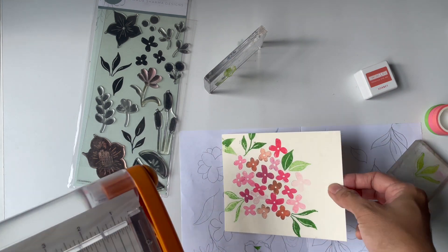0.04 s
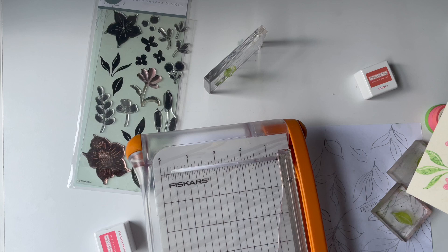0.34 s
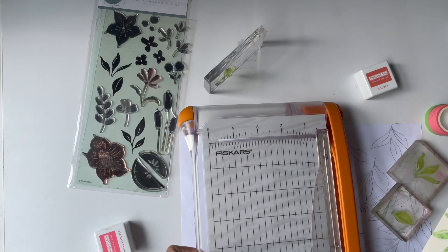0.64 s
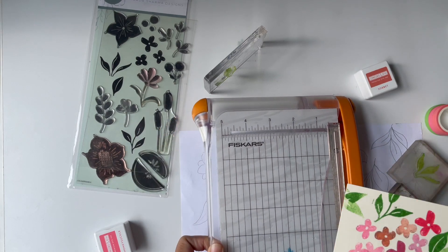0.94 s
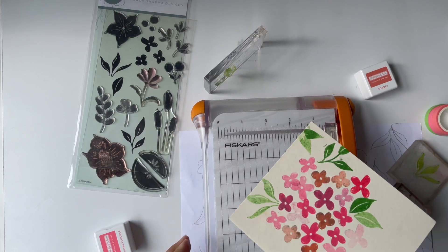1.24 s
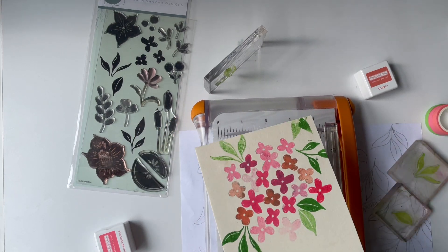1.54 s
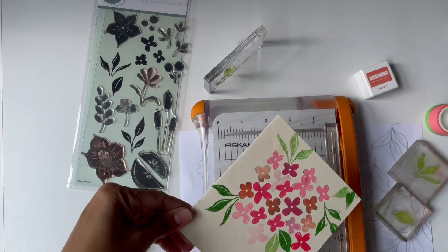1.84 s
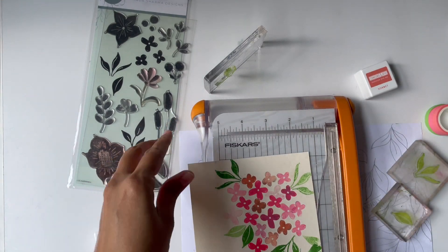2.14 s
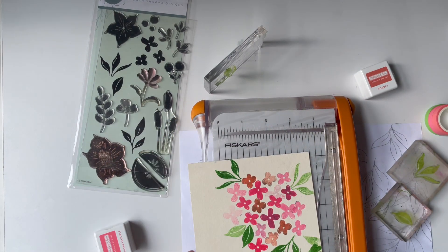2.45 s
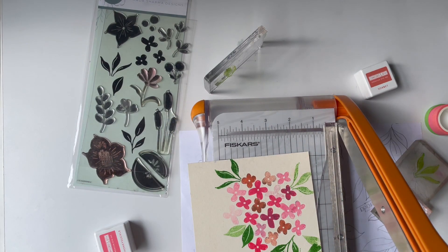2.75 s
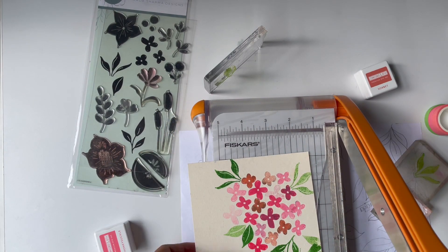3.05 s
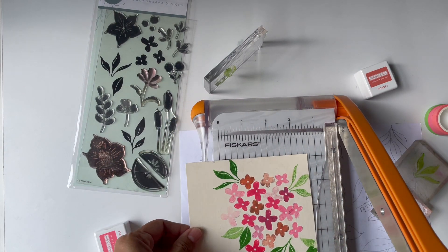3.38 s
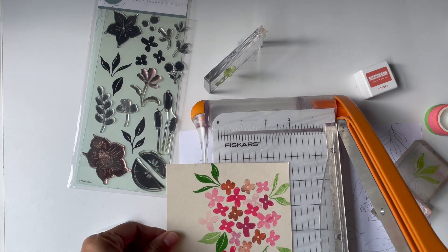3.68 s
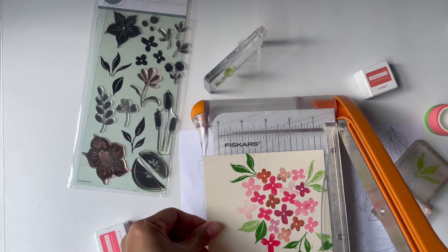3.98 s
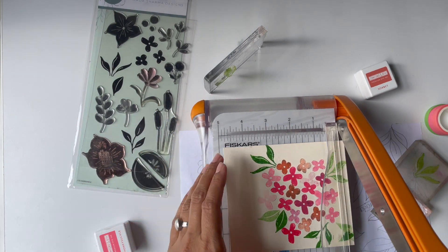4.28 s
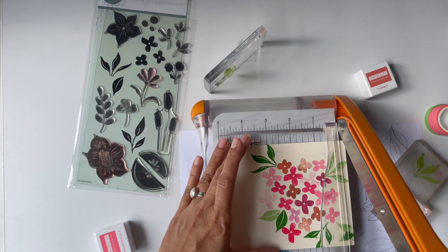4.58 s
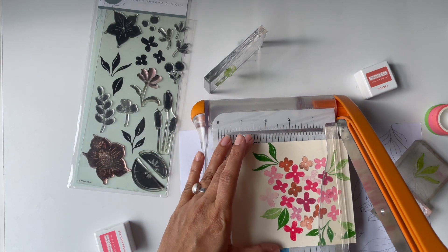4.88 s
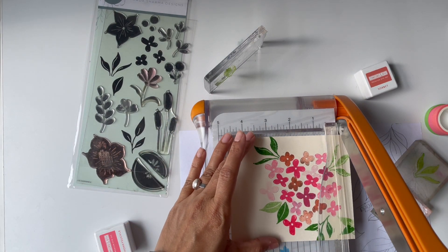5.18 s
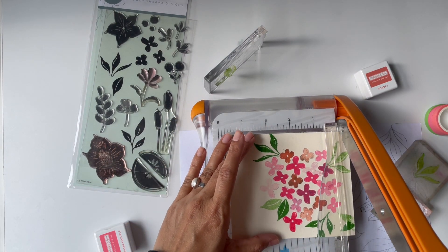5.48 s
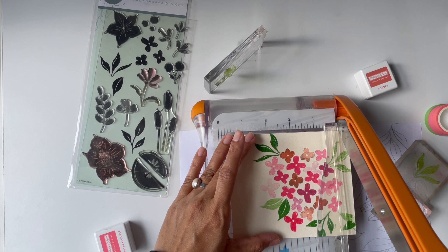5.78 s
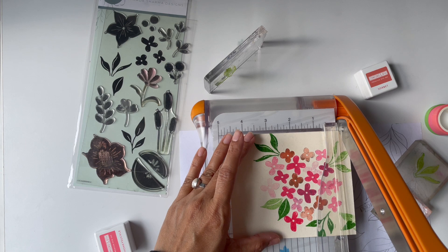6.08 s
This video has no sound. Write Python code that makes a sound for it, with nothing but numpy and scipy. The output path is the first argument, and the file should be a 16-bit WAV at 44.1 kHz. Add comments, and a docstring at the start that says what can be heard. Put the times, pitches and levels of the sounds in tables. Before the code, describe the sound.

A plastic paper trimmer knocks onto a desk, its blade arm lifts with a loud steel scrape, and a card slides and taps.

```python
"""A card is picked up; a plastic guillotine paper trimmer is dragged over a desk, its rubber feet juddering,
and set down with knocks that ring shell and desk top. The card is laid on the bed. At 2.4 s the blade arm lifts
with a loud steel-on-steel scrape, then clacks against its stop. The card is slid about and tapped into line. A
small room rumbles low throughout; the stereo is wide, left and right parting in phase through the treble."""
import sys
import numpy as np
from scipy import signal
from scipy.fft import rfft, irfft, next_fast_len
from scipy.io import wavfile
from scipy.ndimage import uniform_filter1d

SR = 44100
rng = np.random.default_rng(int(sys.argv[2]) if len(sys.argv) > 2 else 0)


def to_wav(sig):
    """Store sig (one row per channel, or 1-D mono) as 16-bit WAV at the path in sys.argv[1].

    Samples outside -1..1 are clipped; the rate is SR.
    """
    pcm = np.clip(np.atleast_2d(sig), -1, 1) * 32767
    pcm = np.round(pcm).astype(np.int16)
    wavfile.write(sys.argv[1], SR, pcm.T)  # frames by channels


N = 278918

# Modes of the plastic shell. Each row: frequency in Hz, relative level in dB, t60 in seconds.
SHELL_MODES = [(580, -7, 0.038), (725.8, 5, 0.082), (791, -2.5, 0.18), (914.4, -11, 0.19),
               (1052, -12, 0.089), (1336, 2, .06), (1637, -6.5, 0.089), (1820, -10.5, 0.044),
               (2516, -18, 0.18), (3030, -20, 0.1)]
# Spectra of plastic clack, dull thud and hollow bed. Each row: frequency in Hz, relative level in dB.
CLACK_SPECTRUM = [(150, -27), (400, -3.5), (700, 7.5), (1000, 1.5), (1450, -0.5), (1900, -8), (2400, -18.5),
                  (3100, -22), (4000, -37), (9000, -53)]
THUD_SPECTRUM = [(40, -20.5), (100, -15), (220, 0.5), (330, 2.5), (480, -17), (900, -37.5), (3000, -65)]
BED_SPECTRUM = [(100, -11), (300, 5), (480, -4), (650, -3), (850, -1), (1300, -4), (2000, -6), (3200, -12),
                (6000, -30.5)]


def amp(db):
    """Decibels to gain."""
    return 10 ** (np.asarray(db) / 20)


def unit(x, size=None):
    """Scale to rms 1, taken over the first size samples if given."""
    return x / np.sqrt(np.mean(x[:size] ** 2) + 1e-20)


def lookup(points, hz):
    """Interpolate a table on a log frequency axis."""
    table_hz, value = np.transpose(points)
    return np.interp(np.log(hz + 1), np.log(table_hz + 1), value)


def add(mix, start_s, sound):
    """Mix a sound in at start_s."""
    part = mix[max(round(start_s * SR), 0):][:len(sound)]
    part += sound[:len(part)]


def colour(x, spectrum, size=4096):
    """Minimum-phase filter with the given spectrum."""
    log_gain = np.log(amp(lookup(spectrum, abs(np.fft.fftfreq(size, 1 / SR)))))
    impulse = np.fft.ifft(np.exp(np.conj(signal.hilbert(log_gain)))).real
    return signal.fftconvolve(x, impulse[:size // 2])[:len(x)]


def resonate(x, hz, width_hz):
    """Two-pole resonance."""
    r = np.exp(-np.pi * width_hz / SR)
    return signal.lfilter([1, 0, -1], [1, -2 * r * np.cos(2 * np.pi * hz / SR), r * r], x)


def soften(x, cutoff_hz):
    """A softer contact loses its treble."""
    return signal.sosfilt(signal.butter(3, cutoff_hz, fs=SR, output="sos"), x)


def drift(size):
    """Noise of rms 1, smoothed over size samples."""
    return unit(uniform_filter1d(rng.standard_normal(N), size))


def burst(spectrum, t60_s, rise_s, size=8192):
    """Contact: pressure builds, then chatter dies in many close, damped modes."""
    t = np.arange(size) / SR
    chatter = rng.choice([-1., 1.], size) * amp(-60 * t / t60_s) * (1 - np.exp(-t / rise_s))
    return unit(colour(chatter, spectrum), size=440)


def ring(modes, vary_db, size=22050):
    """Struck modes; strengths vary with where the blow lands."""
    t = np.arange(size) / SR
    gains = amp(vary_db * rng.standard_normal(len(modes))) * rng.choice([-1, 1], len(modes))
    partials = (gain * amp(db - 60 * t / t60_s) * np.sin(2 * np.pi * hz * t)
                for gain, (hz, db, t60_s) in zip(gains, modes))
    return unit(sum(partials), size=440)


def sing(hz, waver=.012):
    """Rubbed mode: a tone of unsteady pitch."""
    return np.sin(2 * np.pi * np.cumsum(hz * (1 + waver * drift(size=120))) / SR)


def friction(slips_per_s, grain_db, smooth, flutter_db, drift_samples=600):
    """Tiny uneven slips over a smooth rub, clumped by wavering pressure."""
    hits = rng.random(N) < slips_per_s / SR
    slips = hits * amp(grain_db * np.minimum(rng.exponential(1, N), 4)) * rng.choice([-1, 1], N)
    pressure = amp(flutter_db * drift(drift_samples))
    return unit((unit(slips) + smooth * rng.standard_normal(N)) * pressure)


def wander(x, depth_db, bins, frames):
    """A sliding contact moves, so its resonances come and go."""
    spectra = signal.stft(x, SR, nperseg=1024, noverlap=768)[2]
    field = uniform_filter1d(rng.standard_normal(spectra.shape), bins, axis=0)
    field = unit(uniform_filter1d(field, frames, axis=1))
    return unit(signal.istft(spectra * amp(depth_db * field), SR, nperseg=1024, noverlap=768)[1][:N])


def push_gains(pushes, speed_power):
    """Hiss and rub gains; friction follows each push as it speeds up and slows to rest."""
    t, gains = np.arange(N) / SR, np.zeros((2, N))
    for start_s, rise_s, fall_s, hiss_db, rub_db in pushes:
        speed = np.sin(np.pi / 2 * np.interp(t - start_s, [0, rise_s, rise_s + fall_s], [0, 1, 0]))
        gains += amp([[hiss_db], [rub_db]]) * speed ** speed_power
    return gains


def trimmer_knocks():
    """Each blow ticks, rings the plastic shell and pushes the desk top."""
    # Each row: start in seconds, relative clack, thud and tick levels in dB, clack cutoff in Hz.
    blows = [(0.703,-15.5,-28.5,-47.5,5000), (0.71,-19.5,-29,-43.5,4970), (0.751,-20,-31.5,-69,3500),
             (0.766,-16.5,-26,-30.5,5010), (0.777,-25,-27.5,-54.5,2520), (0.804,-20,-40,-66.5,5000),
             (0.821,-21,-29,-57.5,5000), (0.835,-25.5,-31,-54.5,4000), (1.004,-40.5,-39.5,-67,2210),
             (1.029,-39.5,-51,-61,3960), (1.119,-15,-23.5,-58,1680), (2.421,-30,-52.5,-44,4003),
             (2.659,-23,-35.5,-53,4004), (2.702,-20,-33.5,-31,4990), (2.719,-31.5,-33.5,-64,2520),
             (2.733,-25,-31.5,-25,4930)]
    # Each row: frequency in Hz, relative level in dB, t60 in seconds.
    desk_modes = [(112, -2.5, .25), (178.7, -6, 0.16), (226, -3, 0.19), (299.4, -5, 0.36), (409, -5.5, .12),
                  (501, -6.5, 0.22)]
    # Each row: frequency in Hz, relative level in dB.
    tick_spectrum = [(500, -31.5), (1500, -1.5), (2300, 7), (3500, 0.5), (4700, -4), (6000, -1), (9000, -3),
                     (13500, -6.5), (16000, -13.5)]
    out = np.zeros(N)
    for start_s, clack_db, thud_db, tick_db, cutoff_hz in blows:
        clack = burst(CLACK_SPECTRUM, t60_s=.036, rise_s=.0012)
        add(out, start_s, amp(clack_db - 13.5) * soften(clack, cutoff_hz))
        add(out, start_s + .001, amp(clack_db - 14) * soften(ring(SHELL_MODES, vary_db=2), cutoff_hz))
        add(out, start_s + .0015, amp(thud_db - 3.5) * burst(THUD_SPECTRUM, t60_s=.027, rise_s=.002))
        add(out, start_s + .0018, amp(thud_db - 5) * ring(desk_modes, vary_db=3))
        add(out, start_s, amp(tick_db - 4) * burst(tick_spectrum, t60_s=.029, rise_s=.00067))
    return out


def blade_force(bite_db, start_s=2.404, rise_s=.077, hold_s=.03, graze_db=-56, graze_s=.3):
    """The blades press harder, hold, then part; a light graze lasts while the arm swings."""
    t = np.arange(N) / SR - start_s
    parting_db = 270.5 * np.maximum(t - rise_s - hold_s, 0)
    press = amp(bite_db - parting_db) + amp(graze_db) * (t < graze_s)
    return np.clip(t / rise_s, 0, 1) ** 2.3 * press


def blade_scrape(bite_db=-19, grip_db=4.5, catch_db=-32):
    """Steel grinds along steel; stick-slip locks onto one mode after another."""
    # Grind spectrum and blade modes. Each row: frequency in Hz, relative level in dB.
    steel_spectrum = [(100, -24.5), (300, -8.5), (600, -9.5), (1100, -3.5), (1900, 4), (3000, -2),
                      (4600, -8), (6200, -5.5), (7300, -12), (8400, -2), (10500, -12), (13500, -10),
                      (16000, -27.5)]
    blade_modes = [(530, -39.5), (1020, -30), (1305, -32), (1480, -32), (1735, -31), (1850, -32.5),
                   (1940, -30), (2123, -33), (2810, -31.5), (3215, -37), (6330, -37.5)]
    # Blade catches. Each row: centre and half length in seconds, pitch in Hz, full-contact level in dB.
    squeals = [(2.458, .018, 1038, -30.5), (2.47, 0.0055, 1794, -23), (2.473, 0.0021, 5500, -25),
               (2.488, 0.0045, 3920, -22), (2.51, .008, 520, -29), (2.513, .015, 2747, -25.5),
               (2.523, .012, 1720, -29.5), (2.537, 0.0099, 618, -31), (2.565, 0.0047, 1290, -24)]
    force, t = blade_force(bite_db), np.arange(N) / SR
    slips = friction(slips_per_s=1500, grain_db=1.8, smooth=.7, flutter_db=1, drift_samples=150)
    slips = wander(slips, depth_db=3.5, bins=4, frames=6)
    out = amp(-3) * force * unit(colour(slips, steel_spectrum))
    for hz, db in blade_modes:
        grip = unit(amp(grip_db * drift(size=700)))
        out += amp(db - 2 - bite_db) * force * grip * sing(hz)
    contact = np.minimum(force / amp(catch_db), 1)
    for centre_s, half_s, hz, db in squeals:
        out += amp(db) * np.exp(-.5 * ((t - centre_s) / half_s) ** 2) * contact * sing(hz)
    return out


def arm_stop(start_s=2.747, rise_s=.0016):
    """The raised arm settles on its stop with a dull bump."""
    # Each row: frequency in Hz, relative level in dB, t60 in seconds.
    arm_modes = [(241.3, 0.5, 0.062), (299, -17, 0.33), (184.7, -8.5, 0.17)]
    out, body = np.zeros(N), ring(arm_modes, vary_db=1.5)
    attack = 1 - np.exp(-np.arange(len(body)) / SR / rise_s)
    add(out, start_s, amp(-24) * body * attack)
    add(out, start_s, amp(-35) * burst(THUD_SPECTRUM, t60_s=.051, rise_s=.0021))
    return out


def hinge_rub(db=-43, start_s=2.53, length_s=.25):
    """The plastic pivot rubs and sounds the shell as the arm swings."""
    out = np.zeros(N)
    rub = friction(slips_per_s=1200, grain_db=2.2, smooth=.7, flutter_db=1.5)
    rattle = colour(rub, BED_SPECTRUM)[:int(length_s * SR)]
    add(out, start_s, amp(db) * unit(rattle) * signal.windows.tukey(len(rattle), .25))
    return out


def trimmer_drag():
    """Dragged or scuffing feet hiss and set the shell droning."""
    # Each row: start, speed-up and slow-down in seconds, relative hiss and drone levels in dB.
    pushes = [(.235, 0.19, 0.16, -47.5, -43.5), (.68, 0.031, .02, -78, -47.5), (1.085, .034, .02, -77, -50)]
    # Each row: frequency in Hz, relative level in dB.
    hiss_spectrum = [(600, -11.5), (1500, -2.5), (2600, -3), (3600, 3), (4400, -0.5), (5700, 1.5),
                     (8000, -8.5), (11000, -12), (13300, -4), (16000, -19)]
    drone_spectrum = [(100, -11), (220, -16), (300, 9), (430, -9), (520, 4.5), (660, -11), (930, -8),
                      (1400, -16), (4000, -35.5)]
    hiss_gain, drone_gain = push_gains(pushes, speed_power=2.32)
    rub = friction(slips_per_s=6000, grain_db=2, smooth=1, flutter_db=.7)
    rub = wander(rub, depth_db=3.2, bins=9, frames=20)
    hiss = hiss_gain * unit(colour(rub, hiss_spectrum))
    return hiss + amp(-.5) * drone_gain * unit(colour(rub, drone_spectrum))


def feet_judder(peak_db=-57.5, start_s=.51, gap_s=.0252, count=6):
    """As the trimmer slows, its rubber feet stick and skip at an even pace."""
    out = np.zeros(N)
    for k in range(count):
        gain = amp(peak_db) * np.sin(np.pi * (k + 1) / (count + 1))
        add(out, start_s + k * gap_s, gain * burst(CLACK_SPECTRUM, t60_s=.032, rise_s=.001))
    return out


def card_taps():
    """The stiff card snaps at its edge, knocks the hollow bed and skids a little."""
    # Card and fingertip contacts. Each row: start in seconds, relative snap and bed levels in dB.
    taps = [(0.01,-49,-59), (0.149,-59,-52.5), (1.466,-59,-61.5), (1.573,-53,-54.5), (1.947,-46,-40),
            (1.959,-43,-40.5), (2.043,-54,-40), (2.094,-58,-42), (2.1047,-29.5,-41), (2.325,-56.5,-58.5),
            (2.35,-59.5,-72), (2.901,-53,-75), (2.92,-50.5,-55.5), (3.229,-59,-66.5), (3.258,-55.5,-63),
            (3.2851,-56.5,-53), (3.331,-59.5,-65), (3.39,-53.5,-43.5), (3.444,-49,-45.5), (3.457,-51,-44),
            (3.475,-46.5,-42.5), (3.565,-56,-47.5), (3.66,-51.5,-45.5), (3.9118,-35,-40.5),
            (4.3904,-62.5,-87.5), (4.434,-52,-55), (4.445,-44.5,-46.5), (4.662,-28,-43), (4.666,-41,-33),
            (5.269,-63,-85.5), (5.437,-66.5,-84)]
    # Each row: frequency in Hz, relative level in dB.
    snap_spectrum = [(400, -22.5), (1500, -11), (2300, -3.5), (3000, -4), (4800, -5), (6500, -5.5),
                     (9000, -2), (13000, -5), (16000, -21)]
    out = np.zeros(N)
    for start_s, snap_db, bed_db in taps:
        add(out, start_s, amp(snap_db - 8.5) * burst(snap_spectrum, t60_s=.018, rise_s=.0008))
        add(out, start_s, amp(bed_db - 9.5) * burst(BED_SPECTRUM, t60_s=.03, rise_s=.0032))
        add(out, start_s, amp(bed_db - 14.5) * ring(SHELL_MODES, vary_db=1))
        skid = burst(snap_spectrum, t60_s=.078, rise_s=.02)
        add(out, start_s - .006, amp(snap_db - 24) * skid)
    return out


def card_slides():
    """Paper fibres catch on the ribbed bed, which sounds under them."""
    # Each row: start, speed-up and slow-down in seconds, relative hiss and bed levels in dB.
    pushes = [ (0, 0.0033, 0.053, -60, -51.5), (.02, 0.058, 0.21, -66.5, -64), (.86, 0.14, 0.093, -69, -59),
              (1.07, 0.069, 0.11, -63.5, -58), (1.22, .11, 0.12, -72, -66), (1.45, 0.017, 0.14, -74.5, -66),
              (1.56, 0.053, 0.066, -66.5, -58.5), (1.63, .08, 0.34, -81.5, -81),
              (1.95, 0.17, .05, -75, -54), (2.88, 0.044, .2, -76.5, -81), (3.07, 0.21, .12, -79.5, -70),
              (3.34, 0.11, 0.16, -72, -62.5), (3.57, .11, 0.11, -76, -58.5), (3.6, 0.087, 0.31, -75.5, -71),
              (3.89, 0.037, .13, -66.5, -66.5), (4.02, 0.069, 0.12, -67.5, -70.5),
              (4.44, 0.037, 0.058, -83, -66), (4.53, 0.095, 0.083, -76.5, -82.5),
              (4.72, 0.23, .14, -75.5, -78), (5.01, 0.16, 0.12, -71.5, -91.5),
              (5.32, 0.028, .05, -74.5, -95), (5.38, 0.086, .12, -83.5, -94.5),
              (5.55, 0.31, 0.53, -100, -82)]
    # Each row: frequency in Hz, relative level in dB.
    hiss_spectrum = [(700, -15), (2000, -13.5), (3500, -3.5), (4500, -4), (6000, -1), (7500, -1),
                     (11000, 0.5), (13000, 1.5), (16000, -18.5)]
    hiss_gain, bed_gain = push_gains(pushes, speed_power=1.1)
    fibres = friction(slips_per_s=4000, grain_db=2.5, smooth=.9, flutter_db=1)
    fibres = wander(fibres, depth_db=2.8, bins=12, frames=12)
    ribs = friction(slips_per_s=2000, grain_db=2.4, smooth=.8, flutter_db=1.8)
    ribs = wander(ribs, depth_db=3.2, bins=6, frames=12)
    hiss = amp(4.5) * hiss_gain * unit(colour(fibres, hiss_spectrum))
    return hiss + amp(-3.5) * bed_gain * unit(colour(ribs, BED_SPECTRUM))


def card_squeaks():
    """Stick-slip of card and fingers settles briefly on one resonance."""
    # Each row: start and length in seconds, pitch and bandwidth in Hz, level in dB.
    squeaks = [(1.242, 0.078, 2600, 500, -73.5), (3.323, 0.022, 2530, 706, -63),
               (4.076, 0.061, 742, 120.7, -69), (4.134, 0.029, 3285, 600, -60.5),
               (4.847, 0.09, 853, 199, -78), (5.022, 0.253, 3511, 420, -78.5),
               (5.327, 0.056, 3510, 800, -83), (5.719, .18, 1770, 109, -85), (5.943, .13, 1890, 130, -91),
               (6, 0.029, 6010, 1810, -81.5)]
    out = np.zeros(N)
    for start_s, length_s, hz, width_hz, db in squeaks:
        noise = rng.standard_normal(int(length_s * SR))
        tone = resonate(resonate(noise, hz, width_hz), hz, width_hz)
        add(out, start_s, amp(db) * unit(tone * signal.windows.tukey(len(tone), .5)))
    return out


def room_tail(x, build_s=.0085, size=32768):
    """Diffuse tail building after the direct sound, strongest in the bass."""
    # Each row: frequency in Hz, t60 in seconds.
    decay_times = [(150, 0.57), (400, 0.73), (1000, 0.32), (3000, 0.36), (7000, 0.73), (15000, 0.26)]
    hz, t, noise = signal.stft(rng.standard_normal(size), SR, nperseg=256)
    t60_s = lookup(decay_times, hz)[:, None]
    wet = amp(lookup([(300, -7), (1200, -15), (4000, -18)], hz))[:, None]
    decay = np.exp(-np.log(1000) * t / t60_s) * np.sqrt(2 * np.log(1000) / (t60_s * SR))
    tail = signal.istft(noise * wet * decay * np.minimum(t / build_s, 1), SR, nperseg=256)[1]
    return signal.fftconvolve(x, tail)[:N]


def background(rumble_db=-47, hiss_db=-81.5):
    """Steady room rumble and faint hiss."""
    # Each row: frequency in Hz, relative level in dB.
    rumble_spectrum = [(18, -53.5), (28, -23), (42, -2), (58, -1), (78, -6.5), (105, -4), (122, -6),
                       (138, 3.5), (152, -8), (170, -15), (200, -25), (260, -34), (340, -39.5), (500, -47),
                       (1100, -86)]
    hiss_spectrum = [(150, -10), (400, 9), (850, -3), (1500, -7.5), (3000, -10.5), (6000, -13.5),
                     (7600, -4.5), (9000, -11), (12800, -11.5), (16000, -15.5)]
    rumble = colour(rng.standard_normal(N), rumble_spectrum, size=32768)
    rumble = signal.sosfilt(signal.butter(6, 36, "high", fs=SR, output="sos"), rumble)
    hiss = colour(rng.standard_normal(N), hiss_spectrum)
    return amp(rumble_db) * unit(rumble) + amp(hiss_db) * unit(hiss)


def stereo_image(x, echo, size=1600):
    """Near reflections and stray echoes differ between left and right; phase parts in the treble."""
    # Each row: frequency in Hz, phase lead of the left channel in radians.
    phase_lead = [(20, 0), (350, 0), (700, -.3), (1500, .1), (2800, .5), (4000, 1), (4700, 3.3), (5300, 6),
                  (6200, 6.7), (7500, 7.9), (9000, 9.35), (11000, 9.5), (12300, 10.4), (14500, 12.55)]
    # Each row: frequency in Hz, gain of the unshared sound in dB.
    spread = [(50, -39.5), (140, -29), (300, -15.5), (600, -3.5), (1700, -13.5), (2800, -5.5), (4800, -5),
              (5800, -10), (8000, -9.5), (9300, -29.5), (11000, -30), (12300, -11), (13800, -10.5),
              (15000, -25)]
    near = rng.standard_normal(size) * np.linspace(1, 0, size) ** 2
    n_fft = next_fast_len(N + 4 * size)
    hz, shared = np.fft.rfftfreq(n_fft, 1 / SR), rfft(x, n_fft)
    unshared = shared * rfft(near / np.linalg.norm(near), n_fft) + amp(6) * rfft(echo, n_fft)
    unshared *= amp(lookup(spread, hz))
    lead = np.exp(1j * lookup(phase_lead, hz))
    return irfft(np.array([shared + unshared, (shared - unshared) / lead]), n_fft)[:, :N]


def scene():
    """Trimmer and card in the room, in stereo."""
    direct = (trimmer_knocks() + card_taps() + trimmer_drag() + feet_judder() + card_slides()
              + card_squeaks() + blade_scrape() + hinge_rub() + arm_stop())
    return stereo_image(direct + room_tail(direct) + background(), echo=room_tail(direct))


def record(dry):
    """Band limit at 16.1 kHz."""
    lowpass = signal.firwin(301, 16100, window=("kaiser", 9), fs=SR)
    return signal.oaconvolve(dry, lowpass[None], "same")


dry = scene()
out = record(dry)
to_wav(out)
```